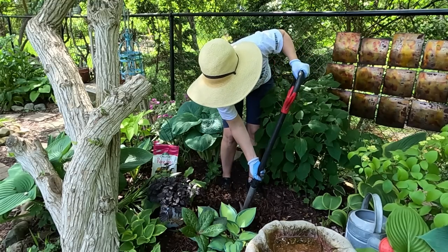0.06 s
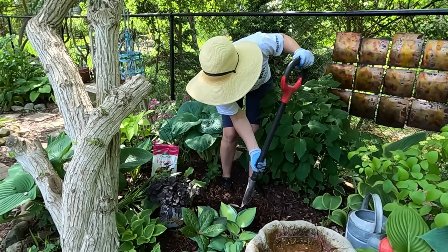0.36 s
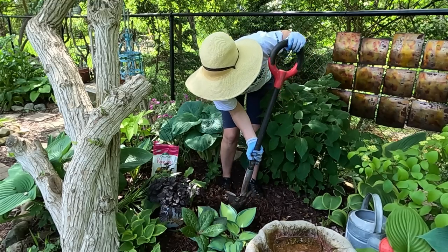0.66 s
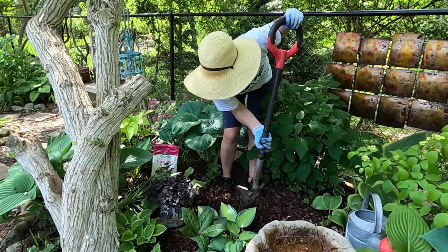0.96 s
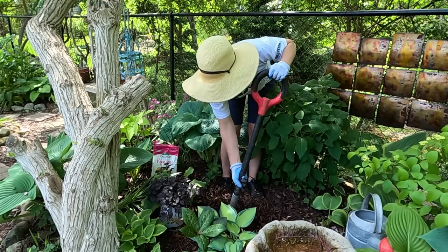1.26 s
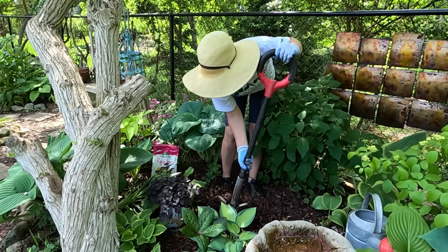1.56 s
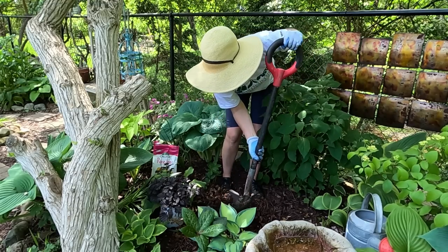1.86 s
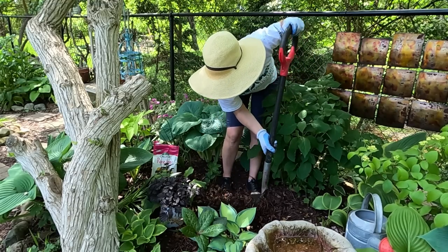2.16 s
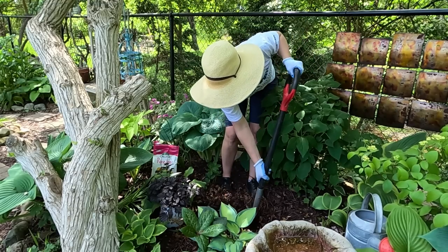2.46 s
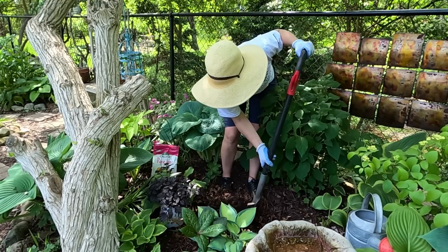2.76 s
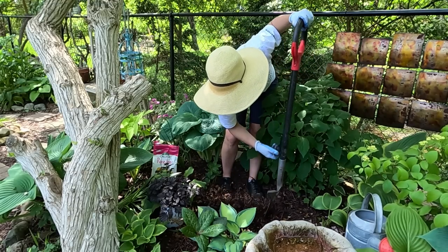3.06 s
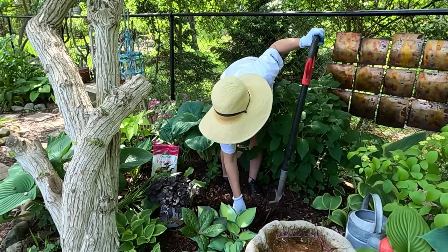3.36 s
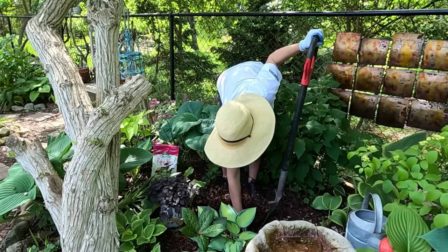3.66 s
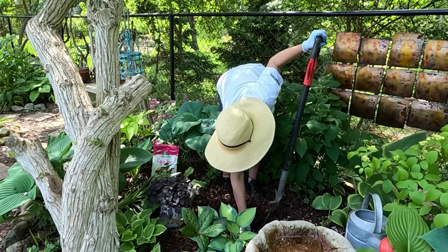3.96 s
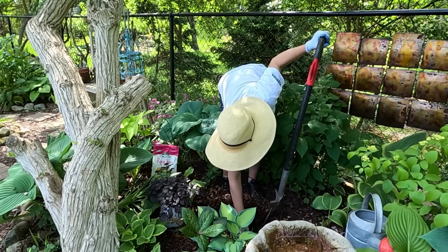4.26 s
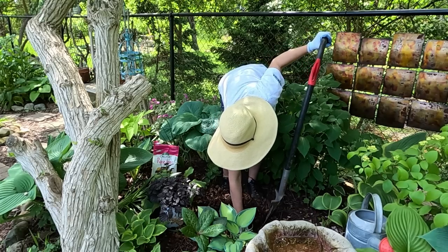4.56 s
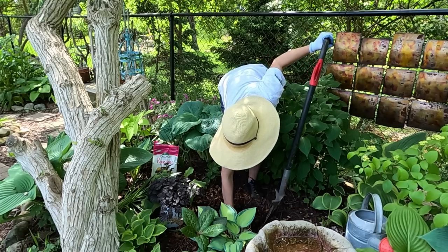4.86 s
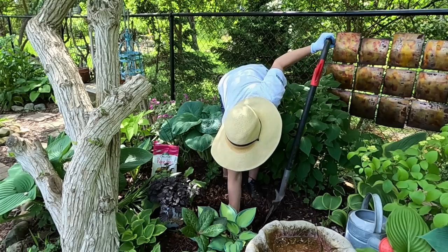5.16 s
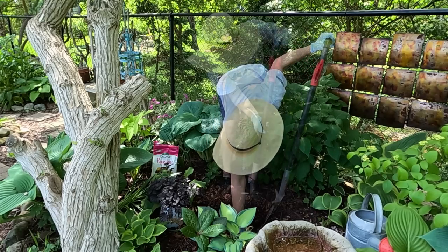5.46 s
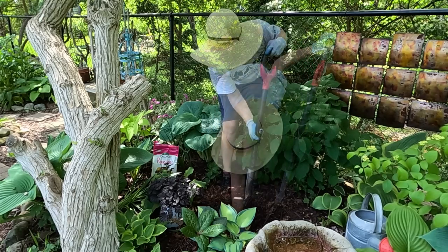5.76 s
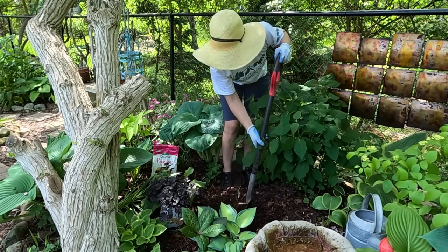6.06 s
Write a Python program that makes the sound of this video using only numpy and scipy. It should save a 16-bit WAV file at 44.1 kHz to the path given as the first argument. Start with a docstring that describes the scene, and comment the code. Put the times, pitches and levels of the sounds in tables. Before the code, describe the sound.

Outdoors in a garden bed, a shovel crunches into crumbly earth three times, with scraping, short stuttering rasps of roots and a faint metallic ring. About halfway through, the digging gives way to the quieter rustle of a glove scooping soil and mulch, dotted with sharp little snaps. One more shovel scrape ends it. Short bird whistles and a low rumble sit behind the centred digging.

```python
"""A garden bed: a steel shovel is stabbed three times into loose soil, levered against roots
that stick and slip, and dragged through the crumbs. The blade is choked while buried and sings
faintly when it comes free. A gloved hand scoops soil, brushes mulch and snaps rootlets, then
the blade scrapes again. Birds whistle over a low outdoor rumble."""
import sys
import numpy as np
from scipy import signal
from scipy.fft import rfft, irfft, next_fast_len
from scipy.io import wavfile

SR = 44100
rng = np.random.default_rng(int(sys.argv[2]) if len(sys.argv) > 2 else 0)


def output_pcm(signal):
    """Save a mono or channel-first signal as 16-bit PCM at the path in sys.argv[1].

    Samples are clipped to [-1, 1] before scaling.
    """
    pcm = np.clip(np.atleast_2d(signal).T, -1, 1) * 32767
    wavfile.write(sys.argv[1], SR, np.round(pcm).astype(np.int16))


N = 278712
TIME_S = np.arange(N) / SR


def from_db(db):
    """Decibels to gain."""
    return 10 ** (np.asarray(db) / 20)


def unit_rms(x):
    """Scale to unit power."""
    return x / np.sqrt(np.mean(x ** 2) + 1e-20)


def curve(rows):
    """Interpolate (seconds, value) rows at every sample."""
    return np.interp(TIME_S, *np.transpose(rows))


def band(x, edge_hz, kind, order=2):
    """Butterworth filter."""
    return signal.sosfilt(signal.butter(order, edge_hz, kind, fs=SR, output="sos"), x + 1e-18)


def coloured(x, spectrum):
    """Give a white source a smooth spectrum; rms 1."""
    hz, db = np.transpose(spectrum)
    size = next_fast_len(N)
    bins_hz = np.maximum(np.fft.rfftfreq(size, 1 / SR), 1)
    gain = from_db(np.interp(np.log(bins_hz), np.log(hz), db))
    return unit_rms(irfft(rfft(x, size) * gain, size)[:N])


def drift(rate_hz):
    """Smooth random wander; rms 1."""
    knots = rng.standard_normal(N // 20)
    return unit_rms(np.interp(TIME_S * rate_hz, np.arange(len(knots)), knots))


def ring(x, hz, t60_s):
    """A resonance that keeps the power of white noise."""
    radius = np.exp(-np.log(1000) / (t60_s * SR))
    zeros = np.sqrt((1 - radius ** 2) / 2) * np.array([1, 0, -1])
    poles = [1, -2 * radius * np.cos(2 * np.pi * hz / SR), radius ** 2]
    return signal.lfilter(zeros, poles, x + 1e-18)


def grains(per_s, spread_db, clump_db):
    """Tiny fractures of uneven size that come in clumps; rms 1."""
    born = rng.random(N) < per_s / SR
    size_db = spread_db * np.minimum(rng.exponential(1, N), 4)
    size_db += clump_db * np.clip(drift(rate_hz=260), -2, 2)
    return unit_rms(born * from_db(size_db) * rng.choice([-1, 1], N))


def add(out, start_s, sound, peak_db):
    """Mix a sound in at a given time and peak."""
    at = min(int(start_s * SR), N - 1)
    out[at:at + len(sound)] += (from_db(peak_db) * sound / np.abs(sound).max())[:N - at]


# Outdoor background spectrum. Each row: frequency in Hz, relative density in dB.
GARDEN_SPECTRUM = [(12, -31), (20, 4.5), (49, 2), (107, 2.5), (168, -10.5), (222, -9.5), (388, -14.5),
                   (678, -12), (2020, -24.5), (2750, -30), (3740, -28), (4420, -28), (7730, -29.5),
                   (13900, -36), (16000, -41)]


def garden(rms_db=-40):
    """Distant rumble and the faint hiss of leaves."""
    return from_db(rms_db) * coloured(rng.standard_normal(N), GARDEN_SPECTRUM)


# Modes of the free blade. Each row: frequency in Hz, relative level in dB, T60 in seconds.
BLADE_MODES = [(975, -4, .16), (1150, -4, .13), (1212, -1, .16), (1685, -5, .18), (1852, 2, .2),
               (2150, -9, .1), (2390, -8, .11), (2520, -6, .11), (3100, -10, .09), (3850, -10, .09),
               (4030, -7, .13), (4925, -3, .16), (5400, -9, .07), (5780, -6, .08), (6590, -6, .16),
               (6790, -7, .13), (7050, -7, .16), (7630, -3, .16), (8440, -11, .1), (9160, -9, .1)]


def blade(force, damping, centre_hz, width_octaves):
    """Steel modes: damping divides their T60, the contact point favours those near centre_hz."""
    mode_hz, mode_db, free_t60_s = np.transpose(BLADE_MODES)
    weights = from_db(mode_db) / (1 + (np.log2(mode_hz / centre_hz) / width_octaves) ** 2)
    weights /= np.linalg.norm(weights)
    modes = zip(weights, mode_hz, free_t60_s / damping)
    return sum(weight * ring(force, hz, t60_s) for weight, hz, t60_s in modes)


def stroke_power(strokes, build_share=.6):
    """Pressure builds, holds and lets go, and the soil settles: power of crumbs, clods and grit."""
    power = np.zeros((3, N))
    for start_s, length_s, settle_s, db, clods_db, grit_db in strokes:
        t = TIME_S - start_s
        build = np.sin(np.pi / 2 * np.clip(t / (build_share * length_s), 0, 1))
        release = np.exp(-np.clip((t - length_s) / settle_s, 0, 20))
        power += (from_db([[db], [db + clods_db], [db + grit_db]]) * build * release) ** 2
    return power


# The blade pushes, levers or drags. Each row: start, length and settling time in seconds,
# crumb level in dB, clod and grit levels in dB re crumbs.
SHOVEL_STROKES = [(0.0, 0.021, 0.063, -34.5, 2, -3), (.14, 0.17, 0.0036, -45, 0, 0),
                  (.38, 0.058, 0.033, -34.5, -3.5, -5), (.45, 0.24, 0.019, -41, -6.5, -1.5),
                  (.92, 0.21, .04, -49, -16, 1), (1.13, 0.14, 0.018, -37, -6, 3),
                  (1.41, 0.15, 0.035, -39, -5, -0.5), (1.60, 0.2, 0.0091, -56, 6, -2),
                  (1.87, .11, 0.043, -36, -4, -4.5), (2.24, .12, 0.071, -36.5, 3, -1.5),
                  (2.475, 0.043, 0.0091, -37.5, -8, -4.5), (2.39, .045, .015, -47, -3, 4),
                  (2.60, 0.097, .03, -42.5, -8.5, -2.5), (2.80, 0.1, .03, -37.5, -13, -0.5),
                  (2.90, 0.056, 0.029, -34, -3, 0), (6.04, 0.3, .03, -35.5, -7, -4.5)]
# The glove sweeps and scoops. Each row: as in SHOVEL_STROKES.
GLOVE_SCOOPS = [(3.15, 0.13, .04, -37, -6, 0), (3.23, 0.2, .05, -38.5, 2, -5),
                (3.49, 0.12, .03, -43.5, -5.5, -12), (3.73, 0.19, .04, -49.5, -2, 0.5),
                (3.98, 0.046, 0.018, -46, -1, -2), (4.50, 0.03, 0.0099, -45.5, 1.5, -3),
                (4.87, .13, .05, -41.5, 0, -6.5), (5.15, 0.049, 0.047, -46, -8, -14),
                (5.51, 0.198, .005, -46.5, -5, -1), (5.82, 0.11, 0.018, -47, -2.5, -20)]
# Loose soil trickling between strokes. Each row: time in seconds, crumb level in dB.
TRICKLE_LEVELS = [(.1, -65), (.33, -49.5), (.8, -50), (1.5, -44.5), (2.1, -42.5), (2.2, -53), (2.4, -47),
                  (3.15, -44), (3.9, -50), (4.3, -54), (5.6, -49.5), (5.75, -59.5), (6.0, -47.5)]
# Spectrum of crumbling soil. Each row: frequency in Hz, relative density in dB.
SOIL_SPECTRUM = [(120, 7.5), (300, 1.5), (420, 1.5), (700, -3.5), (1050, -4.5), (2000, -5), (2900, -6),
                 (3600, -8.5), (4400, -10), (6500, -10.5), (9500, -16.5), (16000, -26)]


def scraping(trickle_clods_db=-5, trickle_grit_db=-1.5, rub_db=-8.5):
    """One stream of fractures sounds in clods, crumbs and grit, and rings the blade rubbing through."""
    shovel_power = stroke_power(SHOVEL_STROKES)
    trickle = from_db(curve(TRICKLE_LEVELS)) * from_db([[0], [trickle_clods_db], [trickle_grit_db]])
    crumbs_gain, clods_gain, grit_gain = np.sqrt(shovel_power + stroke_power(GLOVE_SCOOPS) + trickle ** 2)
    fractures = grains(per_s=5000, spread_db=3.1, clump_db=2.2)
    soil = coloured(fractures, SOIL_SPECTRUM)
    clods = clods_gain * unit_rms(band(soil, [140, 500], "band"))
    crumbs = crumbs_gain * unit_rms(band(soil, [500, 2900], "band", order=3))
    grit = grit_gain * unit_rms(band(soil, 4250, "high", order=4))
    rub = np.sqrt(shovel_power[0]) * fractures
    steel = from_db(rub_db) * blade(rub, damping=.74, centre_hz=2000, width_octaves=6.6)
    return clods + crumbs + grit + steel


# The blade bites into soil and stones. Each row: peak time in seconds, level in dB, rise and decay
# in seconds, relative treble and ring levels in dB, ring centre in Hz, relative thud level in dB.
BLADE_BITES = [(0.0318, -12.5, .0015, .0026, 3, -1, 2000, -20),
               (0.0417, -14.5, .0006, .006, 2.5, 2.5, 1950, -18), (0.040, -28, .016, .014, 0, -3, 1900, -8),
               (1.205, -30, .012, .02, -1, -8, 4900, 2), (1.2345, -19, .007, .007, -4, -.5, 1500, 3),
               (1.247, -16.5, .004, .009, -1.5, -2, 4900, 0), (1.267, -23, .005, .009, -3, -2, 950, 4),
               (2.2876, -18, .001, .006, 1, -5, 2000, -4), (2.3045, -20, .002, .010, -3.5, 3, 1250, 5),
               (2.313, -25.5, .002, .014, -6, 2, 1800, 6), (2.337, -27, .005, .007, -5, 1, 1200, 6)]
# Spectrum of a stab's crunch. Each row: frequency in Hz, relative density in dB.
CRUNCH_SPECTRUM = [(50, 2), (170, 2), (420, 0), (750, -5), (1200, -1), (2100, -2), (2900, -10), (3600, -12),
                   (4400, -6), (7000, -3.5), (9000, -6), (11000, -17), (16000, -26)]


def stabs(ground_hz=106, ground_t60_s=.058):
    """Each bite crushes grit, rings the buried blade and thumps the bed, a damped spring."""
    out = np.zeros(N)
    grit = grains(per_s=24000, spread_db=1.3, clump_db=.6)
    crunch = coloured(grit, CRUNCH_SPECTRUM)
    deep = band(crunch, 700, "low", order=3)
    coarse = band(band(crunch, 950, "high", order=3), 2500, "low")
    fine = -band(crunch, 2800, "high")
    for peak_s, db, rise_s, decay_s, treble_db, ring_db, centre_hz, thud_db in BLADE_BITES:
        span = slice(max(0, int((peak_s - .1) * SR)), int((peak_s + .2) * SR))
        t = TIME_S[span] - peak_s
        push = from_db(db) * np.exp(np.minimum(t / rise_s, -t / decay_s))
        after_s = np.maximum(t, 0)
        ground_decay = np.exp(-np.log(1000) * after_s / ground_t60_s)
        thump = from_db(db + 1.5) * np.sin(2 * np.pi * ground_hz * after_s) * ground_decay
        steel = blade(push * grit[span], damping=4.8, centre_hz=centre_hz, width_octaves=.35)
        out[span] += push * (coarse[span] + from_db(treble_db) * fine[span])
        out[span] += from_db(thud_db) * (thump + 1.78 * push * deep[span])
        out[span] += from_db(ring_db + 1.5) * steel
    return out


def crack(t60_s):
    """A sharp release followed by a short splintering."""
    t = TIME_S[:4096]
    burst = .35 * rng.standard_normal(len(t)) * np.exp(-np.log(1000) * t / t60_s)
    burst[0] = 1.34
    return burst


# Rootlets and twigs snap, pebbles knock.
# Each row: start in seconds, peak in dB, nominal pitch in Hz, T60 in seconds.
TWIG_SNAPS = [(0.1317, -24.5, 1450, 0.025), (0.3057, -18, 5150, 0.0044), (0.358, -26, 4220, 0.0085),
              (0.4257, -21, 2800, .007), (0.609, -36, 2500, .014), (.6224, -32, 3500, .005),
              (0.939, -34, 4540, 0.01), (1.3905, -28.5, 1530, .018), (1.86, -19.5, 5240, 0.03),
              (2.281, -16.5, 9100, .025), (2.364, -23, 1980, .024), (2.3706, -14.5, 2090, 0.012),
              (2.377, -19, 1250, .01), (2.827, -19, 7700, 0.04), (3.5169, -21, 1830, 0.021),
              (3.664, -23.5, 6660, 0.014), (4.708, -20, 8000, 0.0065), (4.727, -16, 7000, 0.017),
              (4.74, -13, 7200, 0.014), (4.875, -22.5, 7100, 0.027), (5.590, -27, 5000, 0.008),
              (5.663, -18, 4480, .006), (5.674, -17.5, 4000, .005), (5.676, -17.5, 673, 0.033),
              (5.689, -22.5, 1770, 0.015)]


def snaps():
    """Single cracks: the thinner the twig, the higher the pitch."""
    out = np.zeros(N)
    for start_s, peak_db, hz, t60_s in TWIG_SNAPS:
        snap = band(crack(t60_s), [hz / 1.72, hz * 1.07], "band", order=1)
        add(out, start_s, snap, peak_db)
    return out


# Roots slip over the edge. Each row: start and end in seconds, first and last rate in slips per
# second, starting peak in dB, level change over the run in dB, low-pass edge in Hz.
ROOT_SLIPS = [(0.46, 0.555, 224, 136, -21.5, -11, 7000), (.588, 0.686, 85, 85, -22, -1.5, 5000),
              (.938, 1.084, 92, 174, -25.5, -6, 7000), (1.139, 1.193, 190, 130, -21.5, -11, 4000),
              (1.784, 1.827, 78, 90, -21.5, 6, 2010), (1.908, 1.993, 125, 165, -17, -5.5, 3500),
              (2.492, 2.519, 102, 64, -25.5, -9.5, 2200), (2.652, 2.75, 147, 168, -17, -9.5, 1540),
              (3.331, 3.429, 74, 110, -34, 12, 1800)]


def roots(ring_db=-6, spread_db=1.5):
    """A taut root sticks and slips; every slip knocks on the buried blade and rasps at its tip."""
    out = np.zeros(N)
    for start_s, end_s, first_per_s, last_per_s, peak_db, change_db, edge_hz in ROOT_SLIPS:
        slip_s = start_s
        slips = [(crack(t60_s=.005), rng.normal(), rng.normal()) for _ in range(30)]
        for burst, jitter, strength in slips:
            if slip_s > end_s:
                break
            progress = (slip_s - start_s) / (end_s - start_s)
            knock = ring(burst, hz=1140, t60_s=.0027) - .5 * ring(burst, hz=2350, t60_s=.0022)
            rasp = ring(burst, hz=4330, t60_s=.0012) - ring(burst, hz=7000, t60_s=.0016)
            steel = from_db(ring_db) * blade(burst, damping=6.5, centre_hz=2570, width_octaves=1.5)
            slip = band(knock + 1.2 * rasp + steel, edge_hz, "low", order=1)
            add(out, slip_s, slip, peak_db + change_db * progress + spread_db * strength)
            slip_s += np.exp(.1 * jitter) / (first_per_s + (last_per_s - first_per_s) * progress)
    return out


# The free blade's edge slides over a pebble.
# Each row: midpoint and length in seconds, level in dB, favoured pitch in Hz, width in octaves.
PEBBLE_SLIDES = [(.60, 0.15, -49, 7800, 0.11), (0.787, 0.22, -50, 1620, 0.22),
                 (0.807, 0.3, -53, 6950, 0.19), (1.042, .13, -39.5, 930, 0.098),
                 (1.148, .035, -36.5, 1000, 0.12), (1.39, 0.18, -55, 4870, .1), (1.524, .1, -48, 7600, 0.2),
                 (1.64, 0.77, -51.5, 1170, 0.27), (1.83, .1, -54, 6900, .17), (2.235, 0.03, -41, 6900, .17),
                 (2.27, .05, -46, 9200, .12), (2.676, 0.18, -56, 4150, 0.063),
                 (2.833, 0.041, -39, 7650, 0.12), (2.868, 0.048, -31, 1600, 1),
                 (2.936, .06, -35.5, 5830, .17), (2.938, 0.097, -37.5, 1320, 0.37),
                 (2.98, 0.045, -46, 7700, .2), (3.226, .08, -41, 6900, 0.18),
                 (3.313, 0.17, -43.5, 980, 0.15), (6.24, 0.39, -45, 1570, 0.42)]


def blade_singing():
    """Friction feeds the blade modes that suit the contact point, and they ring on briefly."""
    out = np.zeros(N)
    friction = grains(per_s=15000, spread_db=4.0, clump_db=-4.5)
    for mid_s, length_s, db, centre_hz, width_octaves in PEBBLE_SLIDES:
        span = slice(int((mid_s - length_s / 2) * SR), min(N, int((mid_s + length_s + .15) * SR)))
        pressure = np.cos(np.pi * np.clip((TIME_S[span] - mid_s) / length_s, -.5, .5))
        force = pressure * friction[span]
        tone = blade(force, damping=1.45, centre_hz=centre_hz, width_octaves=width_octaves)
        out[span] += from_db(db) * tone / np.sqrt(np.sum(tone ** 2) / (length_s * SR))
    return out


# Near birds. Each row: start and length in seconds, first, middle and last pitch in Hz,
# relative level in dB.
BIRD_WHISTLES = [(.54, 0.06, 3090, 2810, 2680, -40), (.543, 0.035, 3380, 3480, 3250, -39),
                 (3.678, .04, 2790, 2310, 1950, -46), (3.728, .085, 2350, 2100, 2120, -44),
                 (3.986, 0.092, 2830, 3250, 3660, -46), (4.055, 0.038, 2030, 2250, 2450, -35),
                 (4.057, 0.12, 3140, 2920, 2920, -51), (4.248, 0.086, 2910, 2605, 2610, -46),
                 (4.54, 0.13, 2170, 2180, 2310, -44.5), (4.768, 0.11, 2840, 2630, 2550, -43.5),
                 (5.439, 0.072, 2970, 2380, 2320, -50), (5.775, 0.077, 3180, 2520, 2060, -47),
                 (5.848, 0.076, 1544, 1583, 1710, -47), (5.87, 0.093, 3140, 2590, 2010, -45.5),
                 (5.962, 0.11, 2110, 2496, 2380, -40), (6.242, 0.033, 3250, 3600, 3830, -35.5)]
# Far birds. Each row: time in seconds, level in dB.
CHORUS_LEVELS = [(3.5, -74), (3.9, -53.5), (4.15, -56), (4.55, -58.5), (5.3, -54.5), (5.6, -49.5),
                 (5.8, -54)]


def birds():
    """Gliding whistles scattered among the trees, and a far chorus blurred into one band."""
    whistles = np.zeros(N)
    for start_s, length_s, *pitches_hz, db in BIRD_WHISTLES:
        progress = np.linspace(0, 1, int(length_s * SR))
        glide_hz = np.polyval(np.polyfit([0, .5, 1], pitches_hz, 2), progress)
        whistle = np.sin(np.pi * progress) * np.sin(2 * np.pi * np.cumsum(glide_hz) / SR)
        add(whistles, start_s, whistle, db + 3)
    t = TIME_S[:SR // 2]
    trunks, foliage = np.exp(-t / .015), .3 * np.exp(-t / .15)
    trees = rng.standard_normal(len(t)) * (trunks + foliage)
    scattered = signal.fftconvolve(whistles, trees / np.linalg.norm(trees))[:N]
    chorus_gain = from_db(curve(CHORUS_LEVELS) + 2.4 * drift(rate_hz=14))
    chorus = chorus_gain * unit_rms(band(rng.standard_normal(N), [2750, 3200], "band"))
    return .7 * whistles + .55 * scattered + chorus


# The glove brushes dry mulch and leaves. Each row: peak time in seconds, level in dB.
MULCH_BRUSHES = [(3.085, -39.5), (3.24, -41), (3.58, -40), (4.015, -44.5), (4.275, -46), (4.84, -38.5),
                 (4.97, -44), (5.18, -45), (5.56, -40), (5.67, -41)]
# Flakes stirred while the hand is in the bed. Each row: time in seconds, level in dB.
RUMMAGE_LEVELS = [(2.9, -80), (3.3, -50), (4.3, -54.5), (5.66, -51), (5.72, -80)]


def mulch(rise_s=.025, decay_s=.027, tick_s=.0021):
    """Thin dry flakes tick, far brighter than the soil; each brush swells quickly and dies away."""
    brushes = np.zeros(N)
    for peak_s, db in MULCH_BRUSHES:
        t = TIME_S - peak_s
        brushes += from_db(db) * np.exp(np.clip(np.minimum(t / rise_s, -t / decay_s), -20, 0))
    rummage = from_db(curve(RUMMAGE_LEVELS))
    ticks = grains(per_s=300, spread_db=3.2, clump_db=2.0)
    tick_power = signal.lfilter([1], [1, -np.exp(-1 / (tick_s * SR))], ticks ** 2 + 1e-12)
    splinters = np.sqrt(tick_power) * rng.standard_normal(N)
    return np.hypot(brushes, rummage) * unit_rms(band(splinters, [4500, 12500], "band"))


def scene(width_lag_s=.006, width_db=-42.5, width_treble_db=-42, hiss_db=-71):
    """Centred sources, a faint, bright stereo width from a short delayed copy, and faint wide hiss."""
    breaking = band(roots() + snaps(), .45 * SR, "low")   # root slips and twig snaps
    centre = stabs() + scraping() + mulch() + blade_singing() + breaking + birds() + garden()
    late = np.pad(centre, (int(width_lag_s * SR), 0))[:N]
    side = from_db(width_db) * late + from_db(width_treble_db) * band(late, 8600, "high", order=1)
    hiss = from_db(hiss_db) * rng.standard_normal((2, N))
    return np.array([centre + side, centre - side]) + hiss


def record(dry):
    """Clip at full scale, then cut the top treble steeply."""
    cutoff_hz = 15900
    low_pass = signal.ellip(10, .1, 80, cutoff_hz, fs=SR, output="sos")
    return signal.sosfilt(low_pass, np.clip(dry, -1, 1))


dry = scene()
out = record(dry)
output_pcm(out)
```